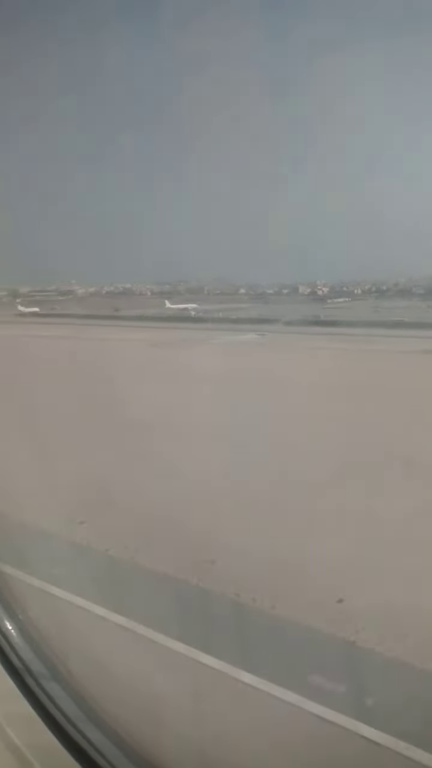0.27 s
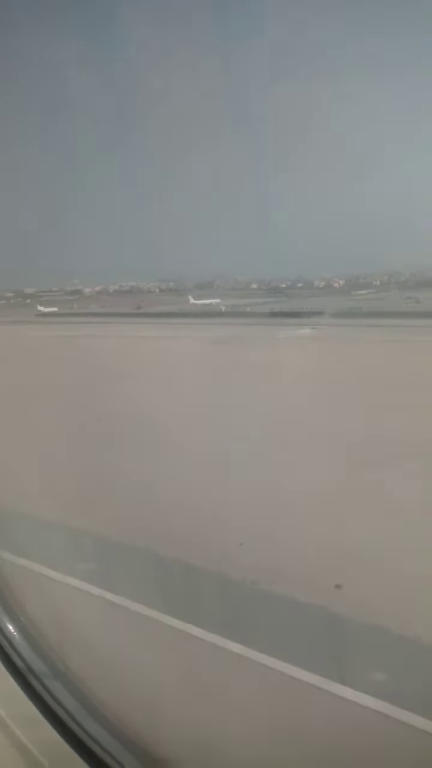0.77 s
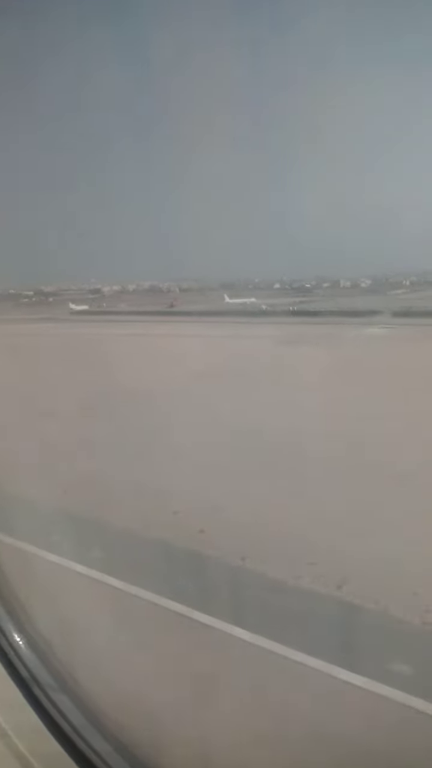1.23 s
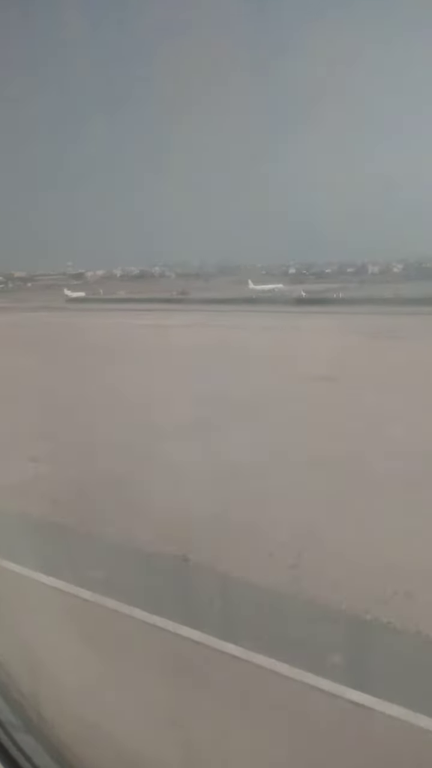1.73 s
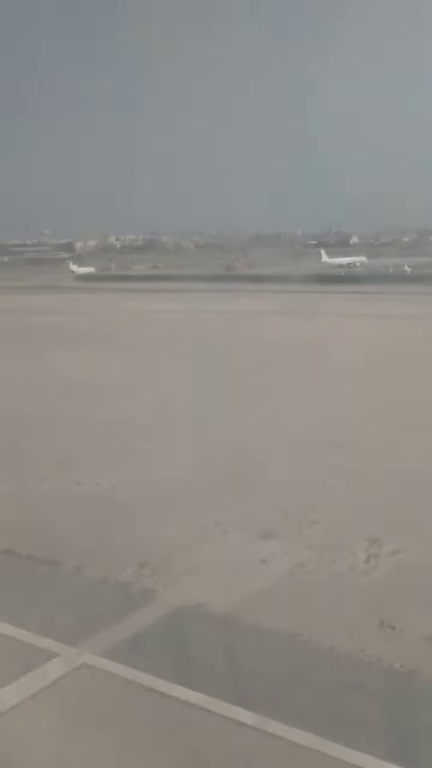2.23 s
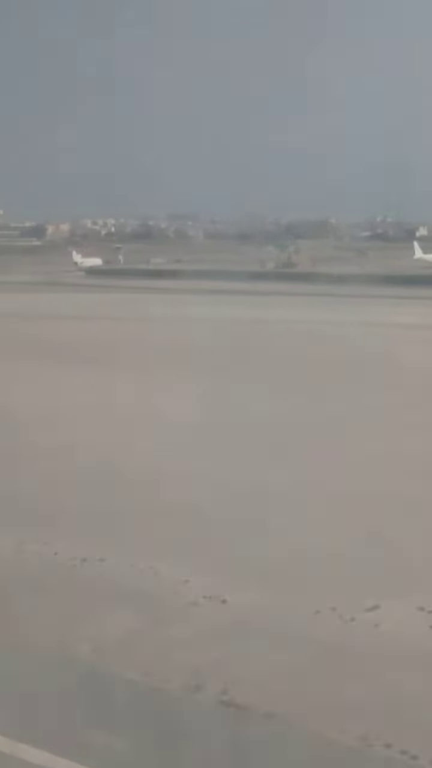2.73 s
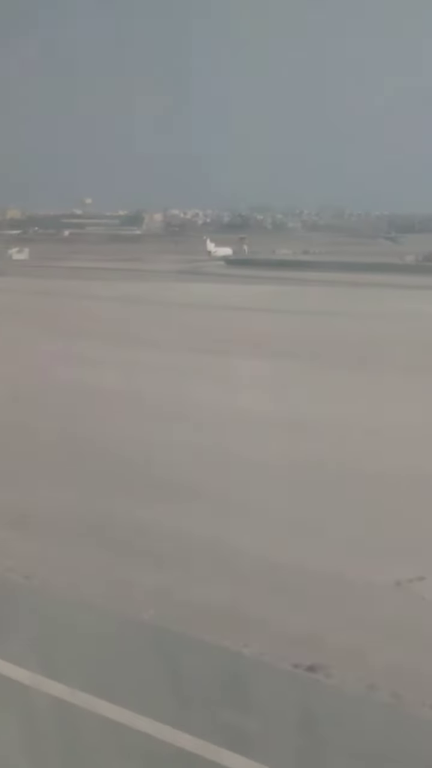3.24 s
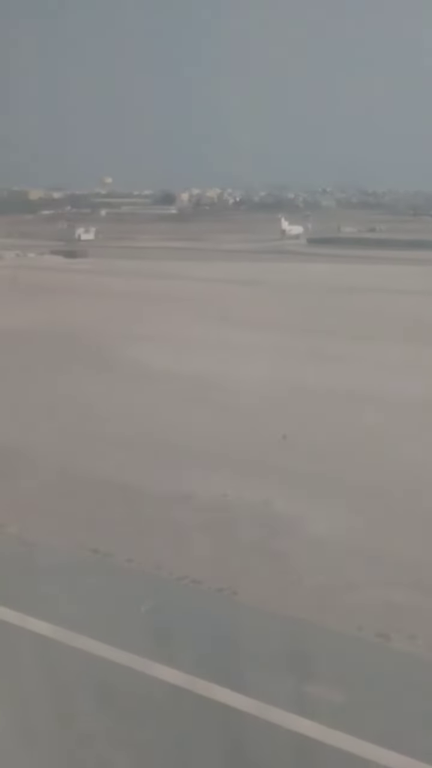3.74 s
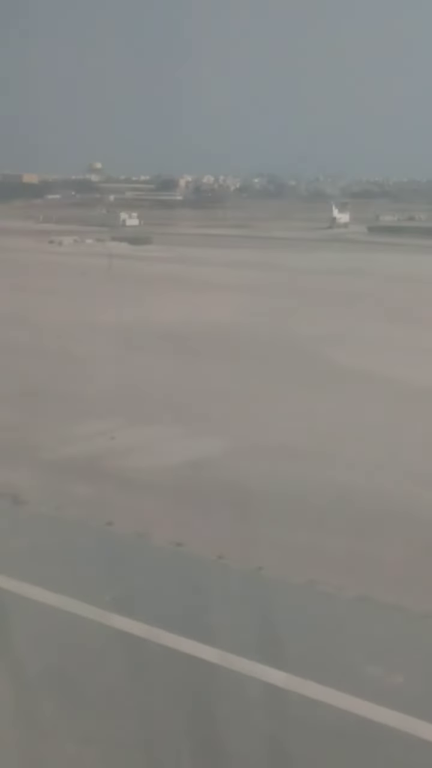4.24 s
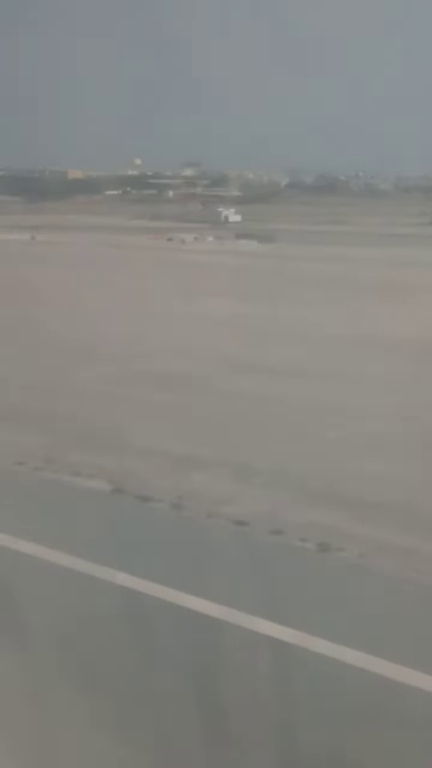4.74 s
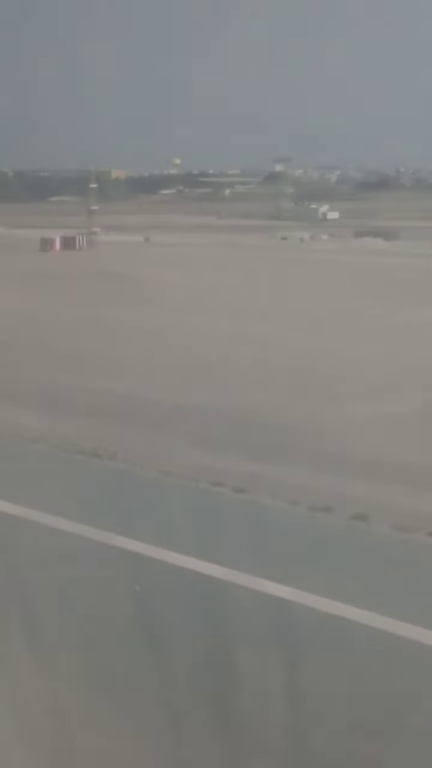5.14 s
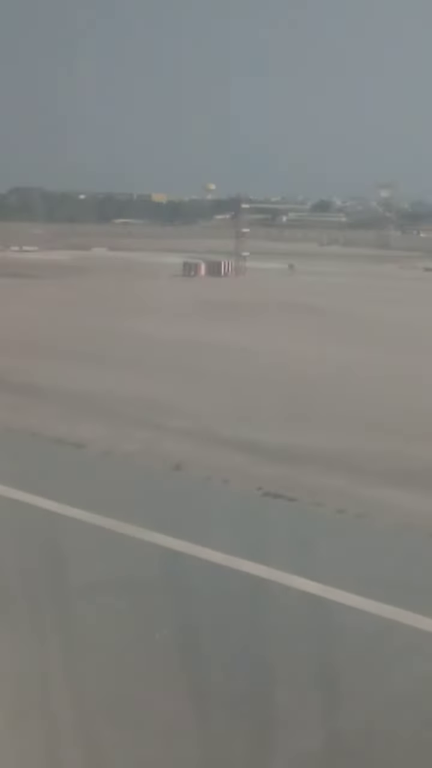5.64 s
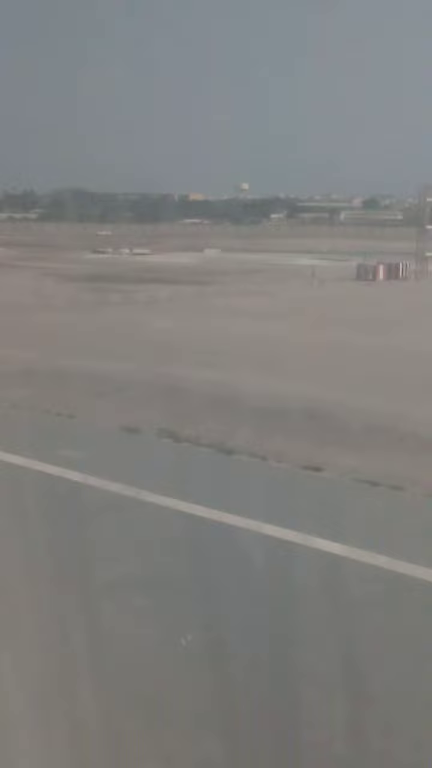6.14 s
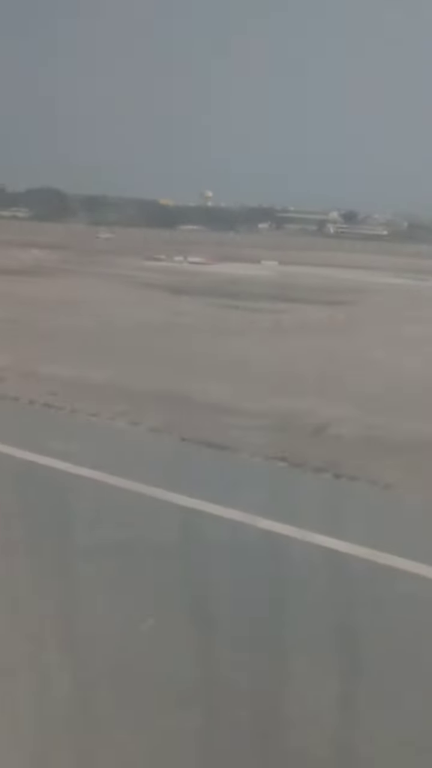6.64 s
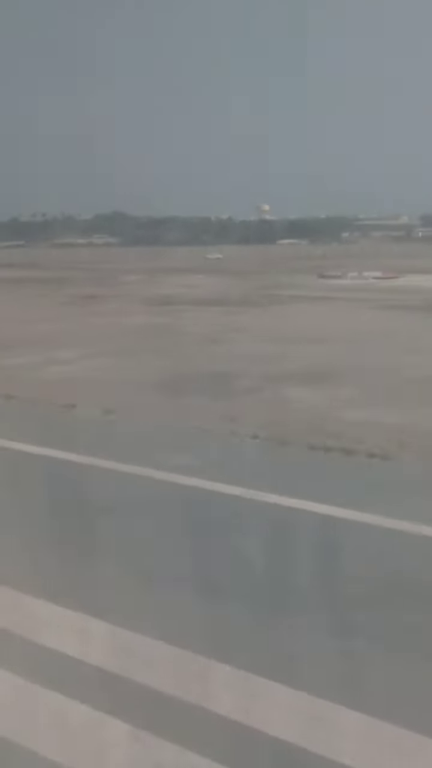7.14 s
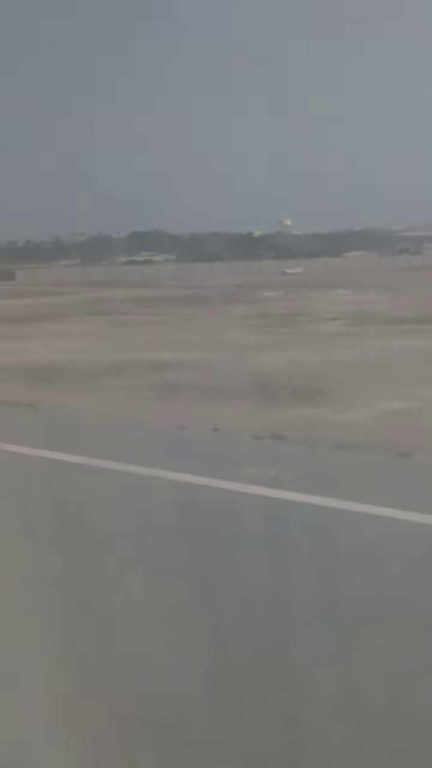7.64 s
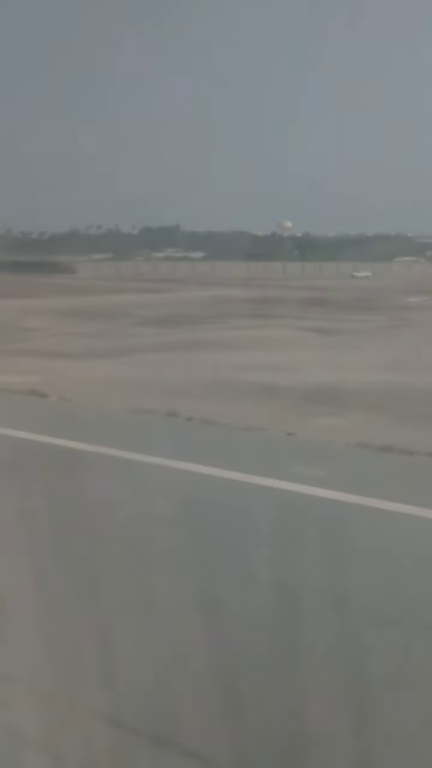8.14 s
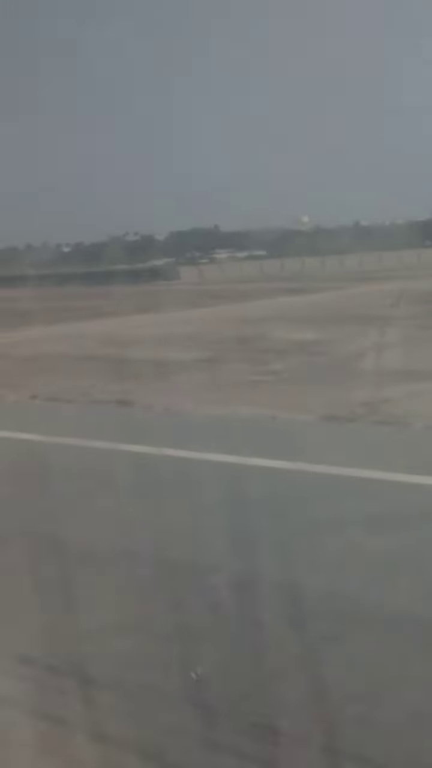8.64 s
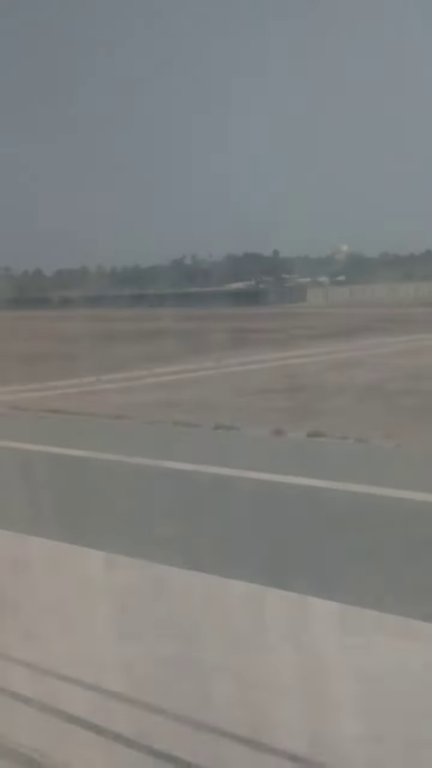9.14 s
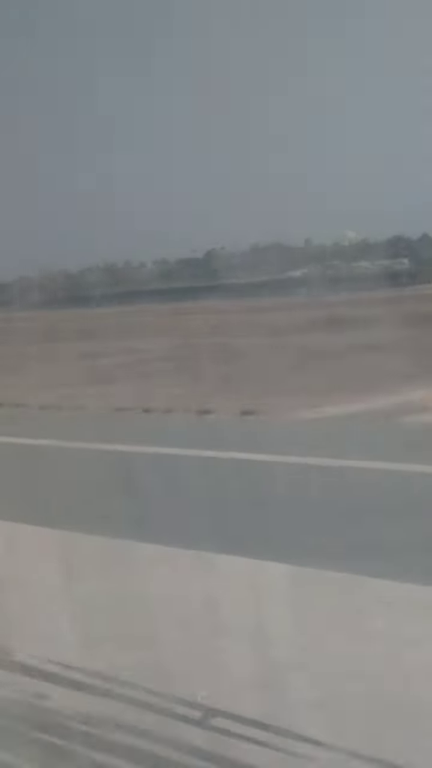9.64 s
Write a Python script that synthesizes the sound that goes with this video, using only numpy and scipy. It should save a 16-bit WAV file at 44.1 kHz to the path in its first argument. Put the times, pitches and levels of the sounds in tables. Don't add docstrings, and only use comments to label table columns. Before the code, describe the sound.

Deep, dull airliner cabin rumble close to a window, phone bumped and rubbed in the first three seconds, faint fan whine falling later.

```python
import sys
import numpy as np
from scipy import signal
from scipy.fft import rfft, irfft, next_fast_len
from scipy.io import wavfile
from scipy.ndimage import uniform_filter1d

SR = 44100
rng = np.random.default_rng(int(sys.argv[2]) if len(sys.argv) > 2 else 0)


def pcm_store(signal):
    levels = np.round(np.clip(np.atleast_2d(signal), -1, 1) * 32767)
    wavfile.write(sys.argv[1], SR, levels.astype(np.int16).T)


def invert_db(x):
    u = np.asarray(x, float) / 20
    return 10 ** u


N = 436590

# freq_hz, density_db_per_hz
WALL_SPECTRUM = [(22, -34.5), (34, -25), (48, -8.5), (62, -10.5), (90, 0.5), (200, -6.5), (330, -8.5),
                 (400, -13.5), (600, -20), (1000, -30), (1300, -38), (1650, -51.5), (1900, -64),
                 (2650, -66)]
# freq_hz, width_hz, lift_db
CABIN_MODES = [(52.7, 27, 3), (119.3, 11, 3.5), (186, 33, 5.5), (274, 39, 4), (341, 17, 2), (510, 66, 2),
               (655, 17, 3.5), (1232, 80, 4), (1650, 140, -2)]
# time_s, level_db
THRUST_LEVEL = [(0, -1.1), (.7, -0.5), (1.3, 0.46), (1.75, 0), (2.25, 0.4), (3.1, -0.56), (4.1, -0.05),
                (4.8, -0.25), (6, -0.6), (7.2, 0.9), (8.3, -1.36), (9.9, -0.3)]
# time_s, level_db
AIRSPEED_LEVEL = [(0, -2), (3, -0.5), (5, -1.5), (7, -1), (8.3, -4), (9.91, -1)]
# time_s, pitch_hz, beat_db
FAN_TRACK = [(0, 1627, 3.5), (.35, 1632, 4), (.58, 1640, -4.5), (1.0, 1657, 3.5), (1.4, 1650, -4.5),
             (2.3, 1645, 2), (3.0, 1662, -2), (3.6, 1666, 0), (4.2, 1654, -5), (4.65, 1651, 5),
             (5.1, 1668, -5), (5.5, 1667, 4), (5.9, 1662, -4.5), (6.32, 1638, 2.5), (8.1, 1258, -0.4),
             (9.9, 926, 1.8)]
# freq_hz, width_hz, lift_db
FAN_PANELS = [(1637, 25, 9.5), (1565, 25, 7.5), (1430, 41, 12), (1264, 62, 22)]
# time_s, pitch_hz, level_db
SHAFT_TRACK = [(0, 215.5, -36), (.9, 216, -33), (1.4, 216.7, -33), (1.7, 216.3, -38.5), (2.4, 216.2, -31.5),
               (3.2, 213.8, -36), (4, 214.4, -35), (4.6, 215.4, -37.5), (5.4, 215, -54), (6.5, 217.6, -88),
               (9.91, 213, -120)]
# freq_hz, density_db_per_hz
HISS_SPECTRUM = [(1500, -114), (2600, -118), (3000, -121), (4500, -124), (5600, -123), (6500, -126),
                 (8000, -130), (13500, -130), (15000, -125), (16500, -124)]
# centre_s, pitch_hz, level_db, length_s
LOUD_SQUEAKS = [(1.9, 484, -37, 0.069), (2.71, 2700, -76.5, .04), (2.9, 1924, -71, 0.066),
                (3.45, 1950, -82, 0.032), (4.17, 1966, -79, 0.033), (4.42, 2033, -77.5, .04),
                (5.0, 2560, -83, 0.048), (6.12, 1830, -77, .05), (6.92, 2480, -82, .06),
                (6.85, 842, -47, 0.08), (6.95, 835, -47, 0.065), (7.15, 507, -35.5, 0.042),
                (7.5, 473, -39.5, 0.22), (8.02, 2036, -74, 0.017), (8.15, 460, -35, .07),
                (8.43, 2310, -80, .025), (9.65, 2000, -79, 0.043)]
# freq_hz, width_hz, level_db
BODY_MODES = [(2200, 380, -0.5), (2620, 360, 0), (3180, 420, -12)]
# freq_hz, width_hz, level_db
CASE_MODES = [(3770, 560, 2), (4470, 350, -8), (5430, 800, -1), (10300, 1800, -18)]
# freq_hz, width_hz, level_db
PORT_MODES = [(15300, 1500, 0)]
# freq_hz, width_hz, level_db
HAND_MODES = [(1150, 210, 7.5), (1435, 210, 5), (1700, 200, -1.5), (2000, 190, -6.5)]
# start_s, body_db, case_re_body_db, port_re_body_db, ring_s
GRIP_TICKS = [(0.619, -58, -13, -31, 0.013), (1.387, -52, -37.5, -35.5, 0.01),
              (2.5496, -59, -32, -34, 0.008), (3.573, -71, -16, -18.5, 0.015), (3.744, -70, -17, -7, 0.012),
              (5.3461, -51.5, -20, -23.5, 0.014), (5.397, -65, -22, -26, 0.012),
              (5.5967, -65, -18, -24.5, 0.012), (6.341, -60, -11, -15, 0.014), (6.44, -67, -9, -26, 0.01),
              (7.816, -57.5, -8, -28.5, 0.011), (9.4525, -65.5, -25, -18.5, 0.0091)]
# start_s, peak_db, pitch_hz, decay_s
WINDOW_KNOCKS = [
    (.619, -19, 600, .0008),
    (1.3881, -6.5, 300, 0.0014),
    (2.552, -8.5, 600, 0.00069),
    (5.348, -19, 700, 0.0012),
]
# start_s, length_s, body_db, change_db, hand_re_body_db
PALM_STROKES = [(0.694, 0.065, -54, -12.5, 1), (.735, 0.035, -70.5, 0.1, 17),
                (.808, 0.023, -63.5, -4.5, 12), (.845, 0.047, -72.5, 1.5, 15.5),
                (1.405, 0.095, -84.5, 13.5, 18.5), (1.518, .06, -73, -0.5, 20),
                (1.615, .11, -78.5, 5.5, 17.5), (1.865, .02, -59.5, -7, 13), (1.888, 0.055, -65, 4, 13.5),
                (1.967, 0.046, -75, -4, 20), (2.035, .04, -72, -6, 14.5), (2.209, 0.058, -74, 0.5, 10.5),
                (2.3, .025, -71.5, -2, 11.5), (2.424, .012, -75, -5, 19), (2.57, .03, -71, -9, 6),
                (2.705, 0.089, -70.5, -15, 15), (2.82, 0.19, -83.5, -1.5, 19.5)]
# start_s, length_s, port_db, change_db, case_re_port_db
PORT_BRUSHES = [(0.689, .075, -55.5, -16, -15.5), (0.721, .05, -85, -1.5, 9), (0.803, .085, -83, -3, 5),
                (1.425, .08, -90.5, 7.5, -7.5), (1.5, .08, -96.5, -2.5, 8), (1.619, 0.12, -99, 4, 4),
                (1.862, 0.18, -95.5, -2.5, 6), (2.209, .11, -94, -5.5, 4), (2.423, .015, -96, -5.5, 9.5),
                (2.694, .08, -93.5, -3.5, 6.5), (2.85, .1, -89, 8.5, -4)]

EDDY_RATE_HZ, EDDY_SPREAD_DB = 3.0, 0.82
FAN_DB, FAN_DB_PER_OCTAVE = -83.5, -22
GRIP_DB_PER_S, LIFT_DB_PER_S = 1497.5, 601
OPENING_CREST, CLOSING_CREST = .092, .066


def unit(x):
    return x / np.sqrt(np.mean(x ** 2))


def slope(points, hz):
    f_hz, db = np.transpose(points)
    return np.interp(np.log(hz + 1), np.log(f_hz), db)


def shape(x, gain):
    n = next_fast_len(len(x))
    hz = np.arange(n // 2 + 1) * SR / n
    return irfft(rfft(x, n) * gain(hz), n)[:len(x)]


def hump(hz, centre_hz, width_hz):
    return 1 / (1 + (2 * (hz - centre_hz) / width_hz) ** 2)


def columns(table, silent_db=-130):
    time_s, *cols = np.transpose(table)
    t = np.arange(N) / SR
    return [np.interp(t, time_s, col, silent_db, silent_db) for col in cols]


def walk(rate_hz):
    hold = int(SR / 32 / rate_hz)
    steps = np.repeat(rng.standard_normal(N // 32 // hold + 2), hold)
    slow = 1.3 * uniform_filter1d(uniform_filter1d(steps, hold), hold)
    return np.interp(np.arange(N) / 32, np.arange(len(slow)), slow)


def tone(hz, db, wobble, flutter_db):
    hz = hz * (1 + wobble * walk(25))
    level = np.sqrt(2) * invert_db(db + flutter_db * walk(19))
    return level * np.sin(2 * np.pi * np.cumsum(hz) / SR)


def body(modes):
    return lambda hz: sum(invert_db(db) * hump(hz, f, w) ** 1.4 for f, w, db in modes)


def through_wall(hz):
    modes_db = sum(lift_db * hump(hz, f, w) for f, w, lift_db in CABIN_MODES)
    return invert_db(slope(WALL_SPECTRUM, hz) + modes_db) / (1 + (hz / 2800) ** 16)


def roar():
    thrust_db = columns(THRUST_LEVEL)[0]
    zone_db = [thrust_db + EDDY_SPREAD_DB * walk(EDDY_RATE_HZ) for _ in range(4)]
    zone_db.append(columns(AIRSPEED_LEVEL)[0] + 0.62 * walk(4) + 1.4 * walk(22))
    n = next_fast_len(N)
    hz = np.arange(n // 2 + 1) * SR / n
    inside = rfft(rng.standard_normal(n)) * through_wall(hz)
    place_octaves = np.log2(hz / 160 + 1e-9)
    out = np.zeros(N)
    for octave in np.arange(-3, 5, .5):
        window = np.cos(np.pi * np.clip(place_octaves - octave, -.5, .5)) ** 2
        band = irfft(inside * window, n)[:N]
        zone = np.searchsorted([-1, 0, 1.5, 2.9], octave)
        flicker_db = 0.77 * walk(16) if zone == 4 else .7 * walk(8)
        out += band * invert_db(zone_db[zone] + flicker_db)
    return unit(out) * invert_db(-25.0)


def fan():
    time_s, pitch_hz, _ = np.transpose(FAN_TRACK)
    hz = np.interp(np.arange(N) / SR, time_s, pitch_hz)
    speed_db = FAN_DB_PER_OCTAVE * np.log2(hz / hz.max())
    panel_db = sum(lift_db * hump(hz, f, w) for f, w, lift_db in FAN_PANELS)
    beat_db = columns(FAN_TRACK, 0)[1]
    return tone(hz, FAN_DB + speed_db + panel_db + beat_db, wobble=.0014, flutter_db=2.2)


def shaft():
    hz, db = columns(SHAFT_TRACK)
    return tone(hz, db, wobble=.0015, flutter_db=0.91)


def vent():
    return invert_db(-104.0) * np.sin(2 * np.pi * 3892 * np.arange(N) / SR)


def hiss():
    return shape(rng.standard_normal(N), lambda hz: invert_db(slope(HISS_SPECTRUM, hz))) * np.sqrt(SR / 2)


def trim(count):
    when, pitch, long = rng.random((count, 3)).T
    faint_hz = 1250 * 2 ** (1.1 * pitch)
    faint_db = slope(WALL_SPECTRUM, faint_hz) - 21.0 + 6.7 * rng.random(count)
    faint = list(zip(when * N / SR, faint_hz, faint_db, 0.0062 + 0.026 * long))
    out = np.zeros(N)
    for centre_s, hz, db, length_s in LOUD_SQUEAKS + faint:
        first = max(int((centre_s - 2 * length_s) * SR), 0)
        last = min(int((centre_s + 2 * length_s) * SR), N)
        i = np.arange(first, last)
        t = i / SR - centre_s
        swell = np.exp(-2 * (t / length_s) ** 2)
        out[i] += invert_db(db) * swell * np.sin(2 * np.pi * hz * t)
    return out


def ticks():
    low, high, top = np.zeros((3, N))
    length = 3000
    t = np.arange(length) / SR
    noise = rng.standard_normal((len(GRIP_TICKS), length))
    for (start_s, db, case_db, port_db, ring_s), chance in zip(GRIP_TICKS, noise):
        start = int(start_s * SR)
        at = slice(start, start + length)
        decay = np.exp(-np.log(1000) * t / max(3 * ring_s, .003))
        burst = invert_db(db) * chance * decay
        low[at] += burst
        high[at] += invert_db(case_db) * burst
        top[at] += invert_db(port_db) * burst
    low = shape(low, body(BODY_MODES + [(1760, 440, 7.1), (1300, 1000, 16)]))
    high = shape(high, body(CASE_MODES))
    top = shape(top, body(PORT_MODES))
    return invert_db(3.5) * low + invert_db(4.0) * high + invert_db(12.0) * top


def knocks():
    out = np.zeros(N)
    length = 1500
    t = np.arange(length) / SR
    for start_s, db, hz, decay_s in WINDOW_KNOCKS:
        start = int(start_s * SR)
        decay = np.exp(-t / max(decay_s, 1e-4))
        out[start:start + length] += invert_db(db) * np.cos(2 * np.pi * hz * t) * decay
    return shape(out, lambda hz: 1 / (1 + (hz / 700) ** 2.7) / (1 + (hz / 3000) ** 10))


def strokes(table, n):
    t = np.arange(0, n, 16) / SR
    main, second = np.zeros((2, len(t)))
    for start_s, length_s, db, change_db, second_db in table:
        stroke_db = change_db * np.clip((t - start_s) / length_s, 0, 1)
        stroke_db -= GRIP_DB_PER_S * np.maximum(start_s - t, 0)
        stroke_db -= LIFT_DB_PER_S * np.maximum(t - start_s - length_s, 0)
        main += invert_db(db + stroke_db)
        second += invert_db(db + second_db + stroke_db)
    return tuple(np.interp(np.arange(n) / SR, t, gain) for gain in (main, second))


def rub():
    out, n = np.zeros(N), N // 3
    gains = strokes(PALM_STROKES, n) + strokes(PORT_BRUSHES, n)
    for gain, modes in zip(gains, (BODY_MODES, HAND_MODES, PORT_MODES, CASE_MODES)):
        slips = rng.standard_normal(n) * invert_db(2.0 * rng.exponential(size=n))
        rings = sum(shape(slips, body([mode])) * invert_db(2.6 * walk(70)[:n]) for mode in modes)
        out[:n] += unit(rings) * gain
    return out


def scene():
    aircraft = roar() + fan() + shaft() + vent()
    handling = ticks() + knocks() + rub()
    return (aircraft + hiss() + trim(count=800) + handling)[None]


def roll_off(x):
    return signal.sosfilt(signal.butter(12, 15750, fs=SR, output="sos"), x)


def record(dry):
    edge_s = np.minimum(np.arange(N), np.arange(N)[::-1]) / SR
    crest = np.exp(-(edge_s / .0012) ** 2)
    mix = dry * (1 - crest) + crest * np.linspace(OPENING_CREST, CLOSING_CREST, N)
    return roll_off(mix)


dry = scene()
out = record(dry)
pcm_store(out)
```